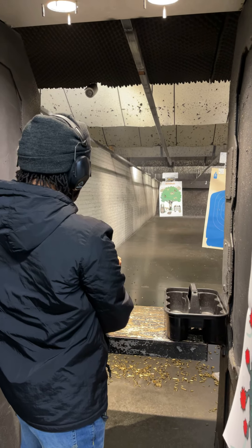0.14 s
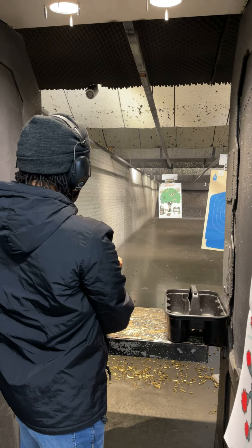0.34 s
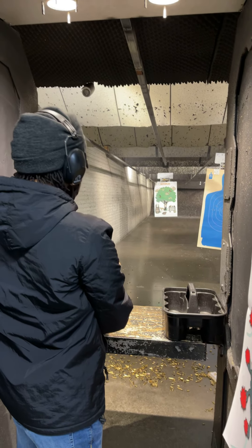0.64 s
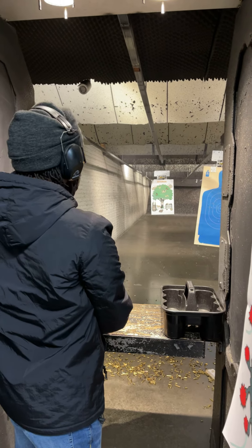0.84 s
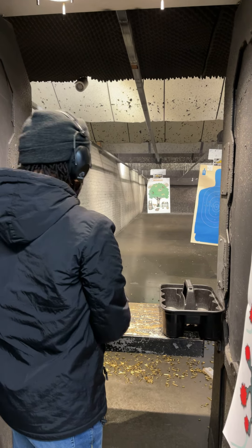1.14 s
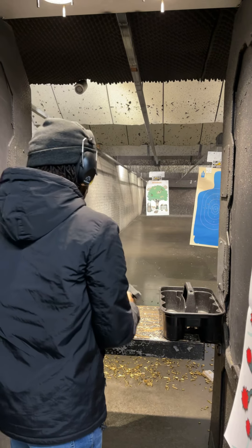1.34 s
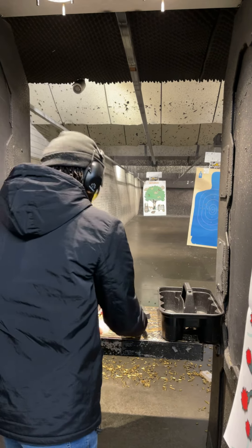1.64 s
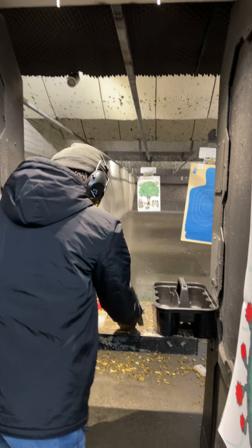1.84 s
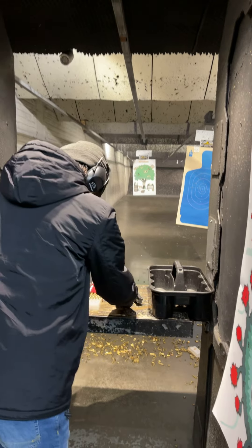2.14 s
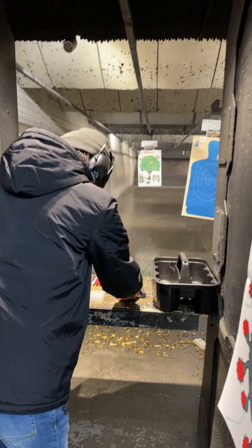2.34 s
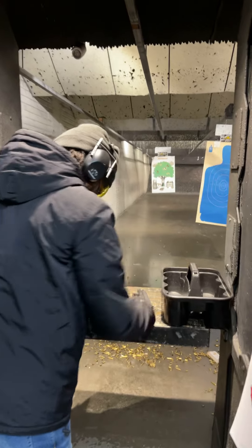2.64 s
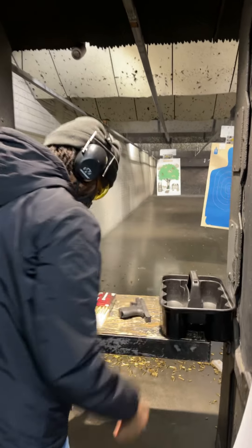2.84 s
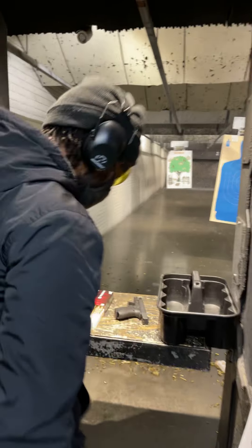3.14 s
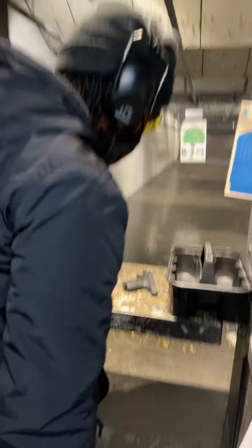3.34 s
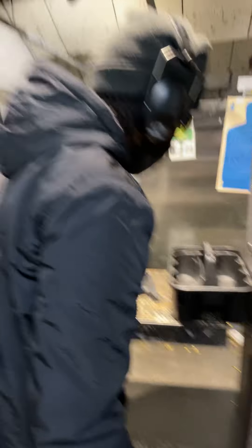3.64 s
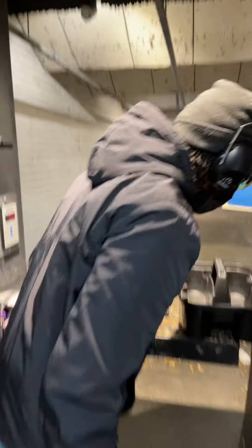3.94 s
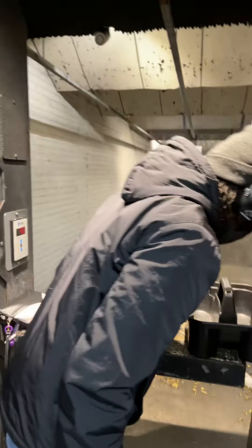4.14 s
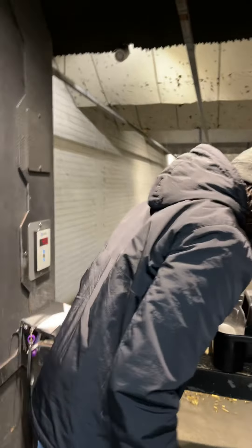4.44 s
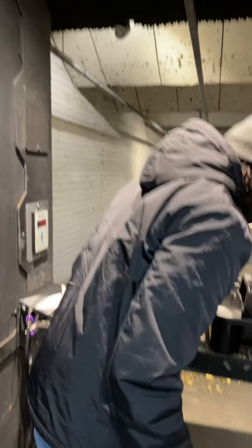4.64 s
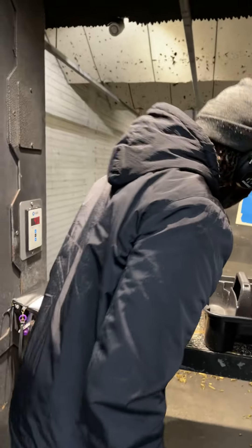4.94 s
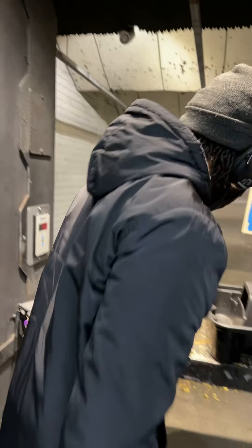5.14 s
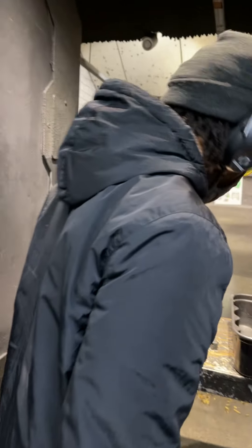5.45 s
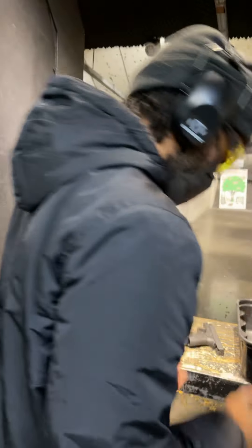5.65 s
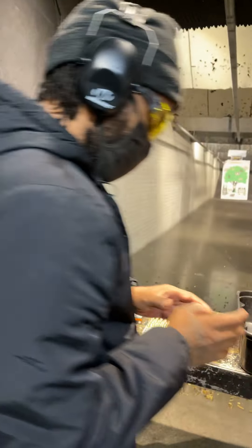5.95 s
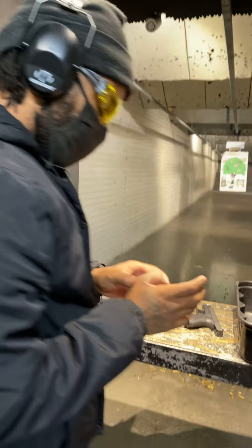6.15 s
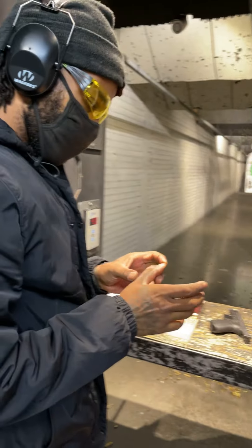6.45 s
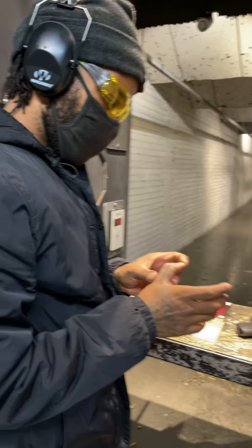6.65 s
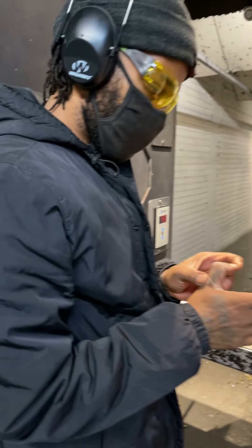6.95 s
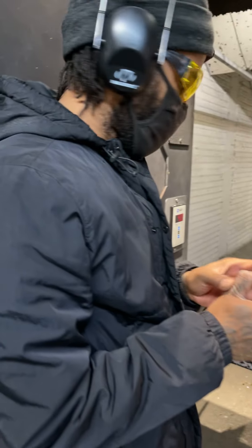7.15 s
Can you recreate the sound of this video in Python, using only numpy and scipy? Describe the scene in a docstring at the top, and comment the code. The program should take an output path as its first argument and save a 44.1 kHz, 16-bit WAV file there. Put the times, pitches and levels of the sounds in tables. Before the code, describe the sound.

A burst of four pistol shots a quarter second apart opens the scene, the last one weaker and muffled. Separate heavy shots follow more than a second apart, each rattling among booths and fading down the hall. After the last, the echo dissolves into quiet low air noise with tiny metal clicks and faint nylon rustling, heard from behind the shooting booths.

```python
"""Pistols fire in neighbouring lanes of an indoor range: a quick overlapping string, then slow single shots.
Each shot is shaped noise: a leak through the partition, a blast among the booths, a wall slap, a boom and
a long hall tail, with a sine thump beneath; a fast limiter holds the peaks.
Ventilation is filtered noise that slowly rises; spent cases skitter as ringing noise bands, small metal
contacts add clicks and thin sine rings, and a nylon jacket rustles as grainy hiss."""
import sys
import numpy as np
from scipy import signal
from scipy.fft import rfft, irfft, next_fast_len
from scipy.io import wavfile
from scipy.ndimage import uniform_filter1d, minimum_filter1d, map_coordinates

SR = 44100
rng = np.random.default_rng(int(sys.argv[2]) if len(sys.argv) > 2 else 0)


def generate_wav(signal):
    """Clip the signal to [-1, 1] and save it as 16-bit WAV at the path in sys.argv[1]."""
    frames = np.transpose(np.atleast_2d(signal))
    scaled = np.clip(frames, -1, 1) * 32767
    pcm = np.round(scaled).astype(np.int16)
    wavfile.write(sys.argv[1], SR, pcm)


N = 321489  # length in samples


def amp(db):
    """Decibels to gain."""
    return 10 ** (np.asarray(db) / 20)


def unit(x):
    """Scale to rms 1."""
    return x / np.sqrt(np.mean(x ** 2) + 1e-20)


def along(points, hz):
    """Read a curve of (f/Hz, value) points on a log frequency axis."""
    f, value = np.transpose(points)
    return np.interp(np.log(hz + 1), np.log(f + 1), value)


def filtered(x, response):
    """Multiply the spectrum of x by a response of frequency."""
    size = next_fast_len(len(x) + 8192)
    hz = np.fft.rfftfreq(size, 1 / SR)
    return irfft(rfft(x, size) * response(hz), size)[:len(x)]


def add(out, s, sound):
    """Mix a sound into out from time s on, cropped at both ends."""
    start = round(s * SR)
    part = sound[max(-start, 0):max(len(out) - start, 0)]
    out[max(start, 0):][:len(part)] += part


def dying(noise, t60):
    """Absorption: let each frequency die at its own speed."""
    hz, t, bins = signal.stft(noise, SR, nperseg=256)
    decay = amp(-60 * t / along(t60, hz)[:, None])
    return signal.istft(bins * decay, SR, nperseg=256)[1][:len(noise)]


def swell(t, rise):
    """Nothing before t = 0, then a build-up with time constant rise (s)."""
    return 1 - np.exp(-np.maximum(t, 0) / rise)


# resonances and gaps of the firing line: (f/Hz, width/Hz, level/dB)
BOOTH_MODES = [(87.3, 26, 3.5), (177, 13, -1.5), (297, 17, 2.5), (425.3, 26, 3), (473.5, 8.5, -2),
               (612, 6.5, 1.5), (853, 32, -0.5), (914, 19, 1), (1035, 15, 2.5), (1115, 16, 2.5),
               (1338, 33, 3.5), (1572, 39, 2.5), (1700, 18, 2), (2060, 12, 1.5), (2335, 53, 1.5),
               (2834, 45, 3), (3123, 70, 2.5), (3424, 37, 2), (3940, 20, 2), (4400, 25, 4), (4534, 48, 3.5),
               (4830, 200, 1.5), (5430, 41, 1.5), (6900, 91, 3.5), (7360, 89, 3.5)]


def reflections(pattern, spectrum, alike=0.39, alike_hz=1600):
    """Dense echoes: long waves partly repeat their paths at every shot, short ones scatter anew."""
    def share(hz):
        return alike / (1 + (hz / alike_hz) ** 4)

    def booth_db(hz):
        return sum(db / (1 + (2 * (hz - centre) / width) ** 2) for centre, width, db in BOOTH_MODES)

    noise = filtered(pattern, lambda hz: np.sqrt(share(hz)))
    noise += filtered(rng.standard_normal(len(pattern)), lambda hz: np.sqrt(1 - share(hz)))
    return unit(filtered(noise, lambda hz: amp(along(spectrum, hz) + booth_db(hz))))


# colour of the hall, also of the muffled leak, as relative density: (f/Hz, level/dB)
HALL_COLOUR = [(25, -35), (40, -23.5), (60, -16.5), (95, -6.5), (170, -3.5), (300, 2), (600, 2),
               (1100, -0.5), (1900, -11), (3000, -12), (5500, -17), (8500, -23.5), (15000, -32)]


def partition_leak(near, t, leak_db, rise=0.0007, t60=0.11):
    """The straight path arrives first, muffled by the partition."""
    return reflections(near, HALL_COLOUR) * swell(t, rise) * amp(leak_db - 60 * t / t60)


# colour of the blast among the booths, as relative density: (f/Hz, level/dB)
BLAST_COLOUR = [(25, -29), (55, -18), (100, -6), (180, -5.5), (280, 2.5), (500, 2), (1000, 1.5),
                (1500, -3.5), (2100, -7.5), (3500, -7), (5500, -7), (8500, -14.5), (12000, -18),
                (16000, -19.5)]
# decay among the booths: (f/Hz, t60/s)
BLAST_T60 = [(100, 0.43), (400, 0.11), (1500, .22), (5000, 0.21), (14000, 0.17)]


def booth_blast(near, t, rise=0.0021):
    """The muzzle blast rattles between booth walls, each frequency fading at its own rate."""
    return dying(reflections(near, BLAST_COLOUR), BLAST_T60) * swell(t, rise)


# the booth's lowest standing wave: (f/Hz, level/dB, rise/s, t60/s)
STANDING_WAVE = (101, -10, 0.01, 0.1519)


def thump(t):
    """The muzzle's push sets the booth's lowest standing wave going as a decaying sine."""
    hz, db, rise, t60 = STANDING_WAVE
    return np.sin(2 * np.pi * hz * t) * swell(t, rise) ** 2 * amp(db - 60 * t / t60)


# colour of the boom under the ceiling baffles, as relative density: (f/Hz, level/dB)
BOOM_COLOUR = [(40, -23), (70, -7), (105, -5), (160, -12), (300, 1.5), (550, 0), (900, -4.5), (1600, -16),
               (4000, -21.5), (7000, -21), (15000, -36.5)]


def ceiling_boom(middle, t, db=-8, rise=0.023, t60=0.4354):
    """Sound builds up under the ceiling baffles, then fades."""
    return reflections(middle, BOOM_COLOUR) * swell(t, rise) * amp(db - 60 * t / t60)


# decay in the concrete hall: (f/Hz, t60/s)
HALL_T60 = [(60, 2.5), (130, 1.8), (250, 1.49), (500, 1.3796), (1000, 1.164), (2000, 1.255), (3500, 1.005),
            (6000, 0.821), (9000, 0.53), (14000, 0.21)]


def hall_tail(far, t, rise=0.0052):
    """The shot rolls away down the concrete hall, the treble dying soonest."""
    return dying(reflections(far, HALL_COLOUR), HALL_T60) * swell(t, rise)


# colour of the wall slap, as relative density: (f/Hz, level/dB)
SLAP_COLOUR = [(100, -20.5), (400, -12.5), (1000, 1.5), (1900, 4), (3000, -4), (14000, -25)]


def wall_slap(far, t, slap_db, delay=0.0352, rise=0.00062, t60=0.059):
    """A wall throws the blast back once, as a short delayed burst."""
    late = np.maximum(t - delay, 0)
    return reflections(far, SLAP_COLOUR) * swell(late, rise) * amp(slap_db - 60 * late / t60)


def clusters(t, depth_db=0.8062, per_s=220):
    """Echoes from baffles and partitions arrive in uneven bunches."""
    bunches = map_coordinates(rng.standard_normal(2048), [np.abs(t) * per_s], mode="wrap")
    return amp(depth_db * bunches)


def tone(hz, bass_db, bark_db, bass_hz=450, bark_hz=900, bark_octaves=1.0):
    """Calibre and lane give each shot its own weight and bark."""
    bark = np.exp(-(np.log2((hz + 1) / bark_hz) / bark_octaves) ** 2)
    return amp(bass_db / (1 + (hz / bass_hz) ** 2) + bark_db * bark)


# the shots; leak and slap are relative to the blast:
# (t/s, blast level/dB, hall level/dB, bass level/dB, bark level/dB, leak level/dB, slap level/dB)
SHOT_LIST = [(-0.035, -15.5, -19.5, -4, 3, -26, -14.5), (0.3, -4.5, -18.5, -6.5, 4, -34.5, -19.5),
             (0.5505, -6.5, -17.5, -3.5, 1, -6.5, -2.5), (0.800, -19, -27, -5.5, -1.5, -2, -8),
             (1.8648, -6, -16, -3, 0, -12, -6), (3.2337, -3.5, -15, -1, -1.5, -11.5, -9),
             (4.5656, -4.5, -15.5, 0, -0.5, -9.5, -11), (5.8661, -4, -13, -1, -1.5, -6.5, -14.5)]


def shots(lead=0.0048):
    """Layer each shot, its partition leak ahead of the blast by lead (s)."""
    out = np.zeros(N)
    t = np.arange(2 * SR) / SR - lead  # zero at the blast
    near, middle, far = rng.standard_normal((3, len(t)))  # echo patterns shared by all shots
    push = thump(t)
    for s, blast_db, hall_db, bass_db, bark_db, leak_db, slap_db in SHOT_LIST:
        close = partition_leak(near, t + lead, leak_db) + booth_blast(near, t) + push
        close += wall_slap(far, t, slap_db) + ceiling_boom(middle, t)
        shot = amp(blast_db) * close + amp(hall_db) * hall_tail(far, t)
        add(out, s - lead, filtered(shot * clusters(t), lambda hz: tone(hz, bass_db, bark_db)))
    return out


# colour of the ventilation, as relative density: (f/Hz, level/dB)
AIR_COLOUR = [(25, -27.5), (50, -9), (80, -3), (125, 0.5), (200, -1), (350, -5.5), (600, -9), (1200, -12),
              (2500, -23.5), (5000, -33), (8000, -41), (15000, -51)]


def ventilation(start_db=-63.5, db_per_s=0.5176):
    """Air pushed down the lanes: low-heavy noise whose level creeps up."""
    air = unit(filtered(rng.standard_normal(N), lambda hz: amp(along(AIR_COLOUR, hz))))
    return air * amp(start_db + db_per_s * np.arange(N) / SR)


# spent cases skittering on the floor: (start t/s, end t/s, level/dB, ring f/Hz)
CASE_ROLLS = [(0.926, 1.48, -81, 10000), (1.049, 1.453, -87.5, 7430), (2.252, 2.955, -80, 10250),
              (3.057, 3.267, -83, 10290), (3.898, 4.204, -86.5, 7360), (5.202, 5.809, -86, 7410)]


def rolls(width_hz=38):
    """Countless tiny contacts, as noise, keep a rolling case ringing with a tremble."""
    out = np.zeros(N)
    for start, end, db, ring_hz in CASE_ROLLS:
        contacts = rng.standard_normal(round((end - start) * SR))
        ring = unit(filtered(contacts, lambda hz: 1 / (1 + ((hz - ring_hz) / width_hz) ** 2)))
        add(out, start, amp(db) * ring * signal.windows.tukey(len(ring), .5))
    return out


# small metal contacts: (t/s, click level/dB, click centre f/Hz, ring level/dB, main ring f/Hz)
METAL_CONTACTS = [(1.467, -67, 9000, -63, 7300), (1.49, -55.5, 5060, -58.5, 10220),
                  (2.573, -64.5, 9000, -73.5, 10240), (2.692, -54, 3620, -82.5, 7365),
                  (3.935, -82, 7000, -76, 7370), (5.5, -70, 4794, -88, 7400),
                  (5.655, -66.5, 4197, -71.5, 7370), (6.438, -60.5, 6920, -74, 7390),
                  (6.761, -60.5, 4080, -69.5, 7380), (6.946, -71.5, 7100, -73.5, 7370),
                  (7.113, -66, 3800, -90, 7370), (7.278, -55, 1891, -66.5, 7380)]
# ringing modes of a cartridge case: (multiple of the main ring, level/dB, t60/s)
CASE_MODES = [(0.999, 2.5, 0.28), (1.841, -7.5, 0.24)]


def clinks(click_t60=0.0068, booth_db=-6, booth_t60=0.12, octaves=0.48):
    """Cases bounce and cartridges are handled: a click, its scatter in the booth and a thin brass ring."""
    out, t = np.zeros(N), np.arange(SR // 2) / SR
    for s, click_db, click_hz, ring_db, ring_hz in METAL_CONTACTS:
        colour = lambda hz: 1 / (1 + (np.log2((hz + 1) / click_hz) / octaves) ** 2)
        click = unit(filtered(rng.standard_normal(len(t)), colour))
        click *= amp(-60 * t / click_t60) + amp(booth_db - 60 * t / booth_t60)
        ring = np.zeros(len(t))
        for multiple, db, t60 in CASE_MODES:
            # the tumbling case and its echoes blur the pitch: a random walk of phase
            blur = np.cumsum(rng.standard_normal(len(t))) * .08
            ring += amp(db - 60 * t / t60) * np.sin(2 * np.pi * ring_hz * multiple * t + blur)
        add(out, s, amp(click_db) * click + amp(ring_db) * ring)
    return out


# colour of sliding nylon, as relative density: (f/Hz, level/dB)
NYLON_COLOUR = [(200, -23), (900, -1.5), (2500, -1), (5000, -2.5), (7500, -5), (9000, -12.5), (15000, -21)]
# arm movements in the jacket: (start t/s, length t/s, level/dB)
ARM_MOVES = [(2.45, 0.495, -71.5), (2.939, 0.214, -74.5), (4.362, 0.395, -70), (5.73, 0.12, -79.5),
             (6.75, 0.156, -78), (7.12, 0.187, -76.5)]


def jacket(grain_db=3, grains_per_s=120, attack=0.3):
    """Nylon folds slip unevenly; each arm movement speeds up for its attack share, then slows to rest."""
    t = np.arange(N) / SR
    slips = map_coordinates(rng.standard_normal(4096), [t * grains_per_s], mode="wrap")
    hiss = filtered(rng.standard_normal(N), lambda hz: amp(along(NYLON_COLOUR, hz)))
    speed = np.zeros(N)
    for start, length, db in ARM_MOVES:
        speed += amp(db) * np.interp((t - start) / length, [0, attack, 1], [0, 1, 0])
    return unit(hiss * amp(grain_db * slips)) * speed


def scene():
    """Everything at one microphone behind the firing line."""
    return (shots() + ventilation() + rolls() + clinks() + jacket())[None]


def record(dry, low_cut_hz=58, ceiling=0.88, top_hz=15850):
    """The microphone sheds deep bass, a fast limiter holds the blasts under full scale; then the band limit."""
    x = signal.sosfilt(signal.butter(4, low_cut_hz, "high", fs=SR, output="sos"), dry[0])
    needed = np.minimum(1, ceiling / (np.abs(x) + 1e-9))
    # hold the lowest gain over 89 samples (2 ms), then smooth it over as many
    gain = uniform_filter1d(minimum_filter1d(needed, size=89), size=89)
    return filtered(x * gain, lambda hz: 1 / np.sqrt(1 + (hz / top_hz) ** 200))[None]


dry = scene()
out = record(dry)
generate_wav(out)
```